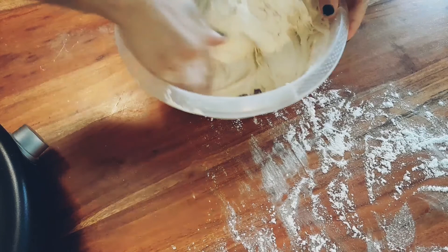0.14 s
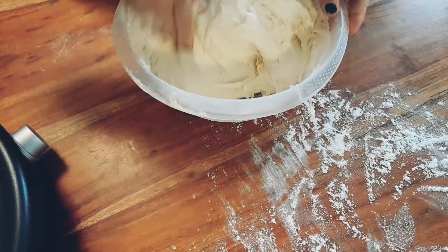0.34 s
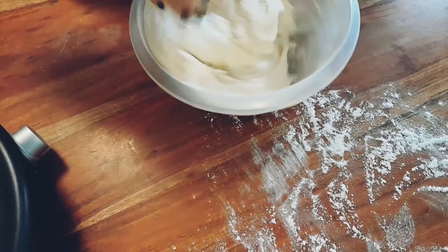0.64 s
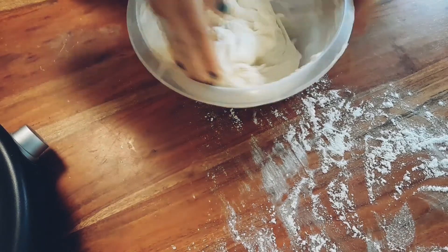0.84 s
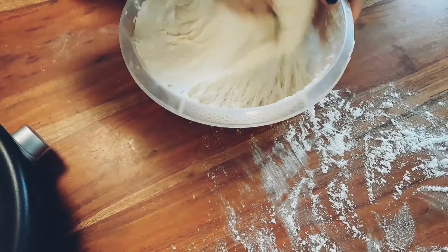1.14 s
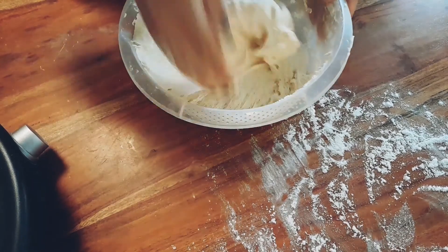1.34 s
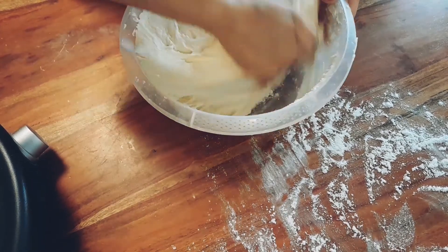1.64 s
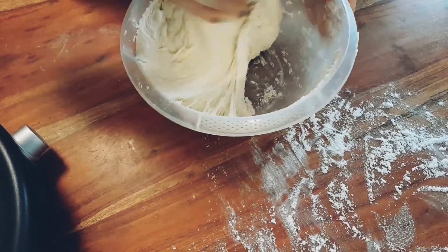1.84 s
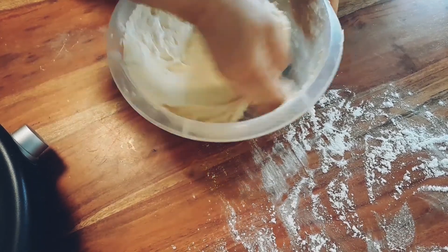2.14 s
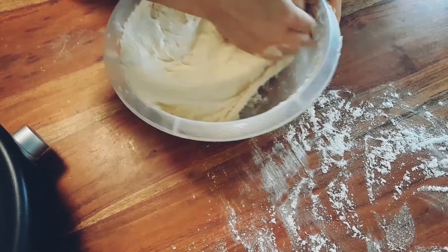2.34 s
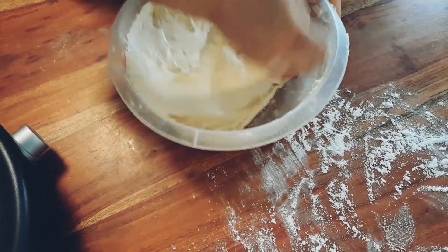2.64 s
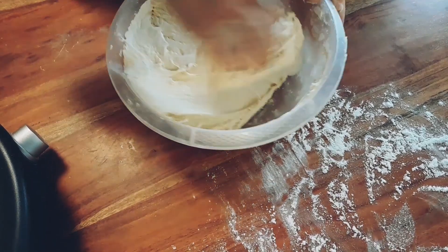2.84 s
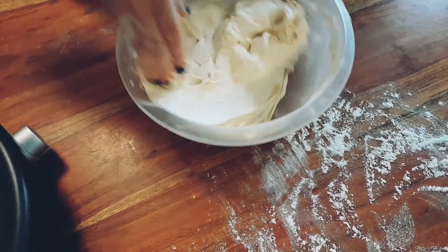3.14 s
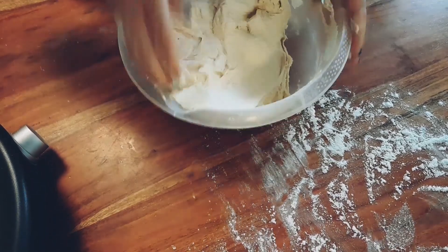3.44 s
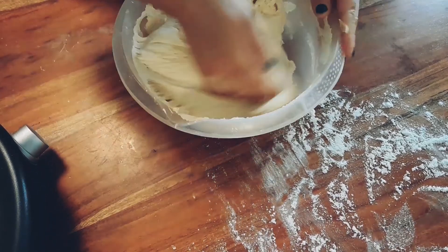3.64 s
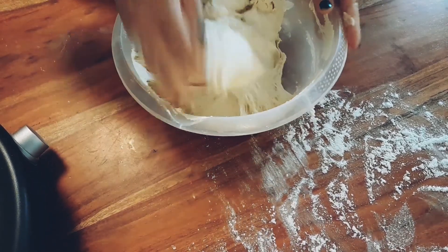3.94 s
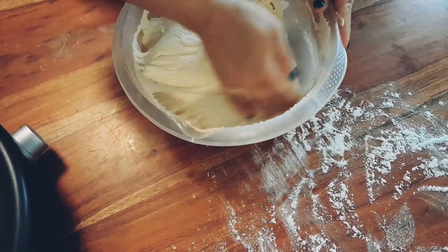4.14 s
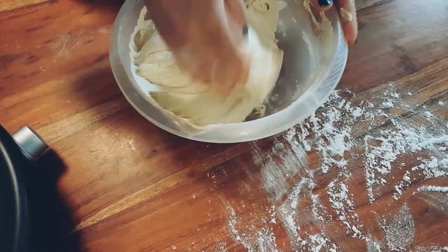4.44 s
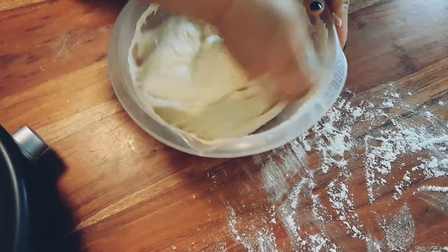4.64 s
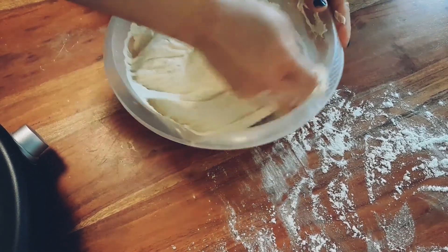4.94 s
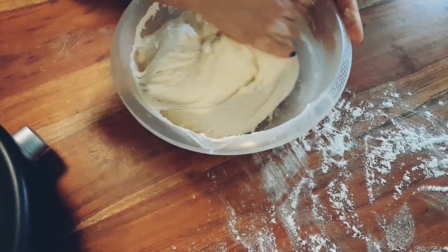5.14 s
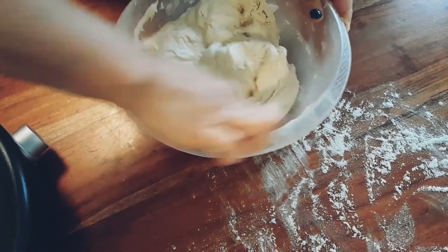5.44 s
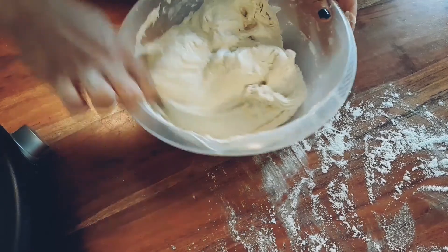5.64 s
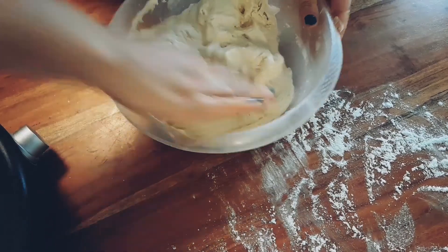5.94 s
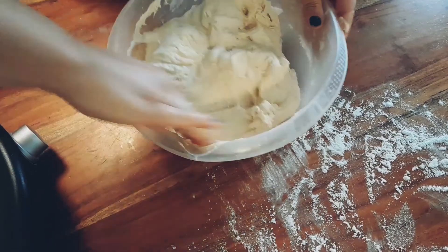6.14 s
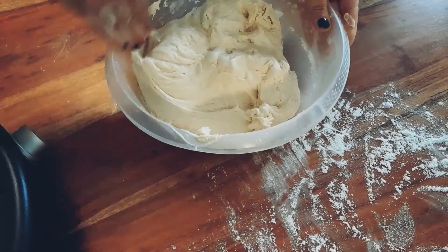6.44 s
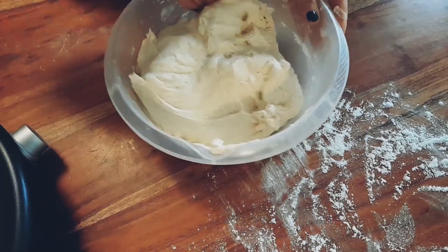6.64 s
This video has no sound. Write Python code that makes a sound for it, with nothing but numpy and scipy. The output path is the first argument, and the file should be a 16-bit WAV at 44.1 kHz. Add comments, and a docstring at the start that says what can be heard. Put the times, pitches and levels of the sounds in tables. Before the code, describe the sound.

Hands knead soft, sticky dough in a plastic bowl, with wet squelches, fine peeling crackles, popping air pockets and dull table thumps in a small kitchen.

```python
"""On a wooden table in a small, hard kitchen, a hand kneads soft, sticky dough in a plastic bowl.
Pushes excite damped modes of the table and a dull noise thud in the dough; air pockets burst as
a crack, a puff and a brief cavity ring. Peeling dough crackles as random impulses, with wet bubbles
squelching below. Near the end skin rubs over the bowl's rim as filtered stick-slip noise.
One wall echo, diffuse reverberation and faint room tone surround them."""
import sys
import numpy as np
from scipy import signal
from scipy.fft import rfft, irfft, next_fast_len
from scipy.io import wavfile
from scipy.ndimage import map_coordinates

SR = 44100
rng = np.random.default_rng(int(sys.argv[2]) if len(sys.argv) > 2 else 0)


def to_wav(sig):
    """Store sig (one row per channel, or 1-D mono) as 16-bit WAV at the path in sys.argv[1].

    Samples outside -1..1 are clipped; the rate is SR.
    """
    pcm = np.clip(np.atleast_2d(sig), -1, 1) * 32767
    pcm = np.round(pcm).astype(np.int16)
    wavfile.write(sys.argv[1], SR, pcm.T)  # frames by channels


N = 299174

# Strokes of the hand through the dough:
# (time of the height [s], swell [s], ebb [s], relative crackle level [dB], squelch relative to crackle [dB])
STROKES = [(0.047, 0.035, .08, -60.5, 4), (0.11, 0.031, 0.16, -53, 0.5), (0.655, 0.11, 0.059, -53, 9.5),
           (0.709, 0.3, 0.14, -46.5, -8), (0.902, 0.04, 0.14, -47, -1), (1.12, 0.43, 0.086, -58.5, 2.5),
           (1.243, .039, 0.078, -64, 4), (1.429, 0.018, 0.17, -60.5, -3), (1.509, 0.081, .13, -57.5, 4.5),
           (1.63, 0.068, 0.24, -60, 0.5), (1.83, 0.16, 0.035, -63, 9), (1.978, 0.13, 0.25, -61, 6),
           (2.115, 0.027, 0.14, -58, 9), (2.243, 0.1, 0.061, -52.5, 5), (2.377, 0.089, 0.032, -52.5, 5),
           (2.645, .13, 0.18, -59.5, 3.5), (2.795, 0.044, 0.062, -65, 9.5), (2.945, 0.12, 0.22, -57, 5),
           (3.216, 0.23, 0.18, -48, -3), (3.472, 0.01, 0.19, -52, 0), (3.563, 0.052, 0.03, -53.5, 5),
           (3.793, 0.035, 0.14, -63, 13.5), (4.118, 0.13, 0.058, -55.5, 1), (4.249, 0.047, 0.096, -63, 3),
           (4.41, 0.19, 0.13, -74, 1.5), (4.617, 0.12, 0.13, -52.5, -4), (4.835, 0.07, .065, -57, 3),
           (4.932, 0.037, 0.21, -59.5, 3), (5.05, 0.076, 0.038, -46.5, -7),
           (5.11, 0.035, 0.022, -47.5, 1.5), (5.225, 0.078, 0.061, -58.5, -3), (5.489, 0.12, .16, -57, 8),
           (5.703, 0.12, 0.14, -61.5, 4), (6.06, 0.21, 0.071, -58, -4), (6.145, 0.22, 0.16, -58.5, 2),
           (6.42, 0.19, 0.072, -65, 2), (6.515, 0.052, 0.038, -50.5, -9), (6.6, 0.078, .16, -56.5, 0.5),
           (6.765, 0.032, 0.017, -59, -3)]
# Pushes on the bowl, relative levels:
# (time [s], low table sway [dB], higher table boom [dB], dough squash [dB], rise [s])
PUSHES = [(0.0, -42, -35, -41, 0.0014), (0.063, -40, -66, -49, 0.024), (0.123, -44.5, -46.5, -39.5, 0.01),
          (0.618, -40, -26, -37, 0.013), (0.643, -44, -21, -23, 0.0047), (0.69, -34, -30, -30.5, .0051),
          (0.888, -48, -32.5, -30.5, 0.012), (0.923, -36, -30.5, -26.5, .0025),
          (1.225, -45.5, -48, -50, 0.017), (1.427, -41.5, -46.5, -50, 0.038),
          (2.101, -60, -58, -39, 0.0065), (2.536, -48, -57, -47, 0.022), (2.86, -54, -52.5, -49, 0.0087),
          (3.15, -58, -68, -54, .005), (3.47, -67, -44, -46, 0.0056), (3.512, -48, -46, -57, .0054),
          (3.866, -47, -47.5, -47.5, 0.027), (4.011, -41, -50, -50, 0.014), (4.09, -51, -53.5, -56, 0.015),
          (4.581, -49.5, -55.5, -49.5, 0.094), (4.814, -46, -33, -44, 0.018),
          (4.835, -31, -38.5, -40.5, 0.013), (4.908, -41, -32.5, -31, 0.0033),
          (4.985, -40, -36, -36.5, 0.026), (5.039, -32, -32, -30, 0.00094), (5.44, -56, -58, -41, 0.0036),
          (5.466, -44.5, -40.5, -36.5, 0.0041), (5.536, -36, -37.5, -36.5, 0.0096),
          (6.012, -35.5, -48.5, -47, .044), (6.073, -46, -49, -48.5, 0.045)]
# Bursting air pockets:
# (time [s], relative level [dB], pitch [Hz], relative wet crack level [dB], left minus right [dB])
POPS = [(0.037, -34, 2300, -21, 0.5), (0.105, -43, 670, -1, 3), (0.648, -27.5, 770, -5, 5),
        (0.804, -27, 830, 6.5, -1), (1.202, -35.5, 1280, -12, -1), (1.301, -46, 1550, -10, 5),
        (1.821, -41, 930, -10, 5), (2.104, -35.5, 583, 10.5, 4.5), (2.352, -24, 1166, -12.5, 3.5),
        (2.537, -42, 1010, 10, 2), (2.989, -39, 1930, -14, 4), (3.152, -36, 840, -16, 5),
        (3.281, -41.5, 430, -2, -7), (3.783, -14.5, 1013, -28, 0.5), (3.992, -37.5, 720, -22, 1),
        (4.911, -35, 1430, -3, -5), (5.001, -16, 6530, 3.5, 5.5), (5.0033, -13.5, 5320, -9.5, -15),
        (5.396, -32, 1570, 1, 3), (5.4384, -25.5, 1010, -10.5, 6.5), (6.024, -30, 1810, -5, 3.5),
        (6.239, -32.5, 1000, -15, -5), (6.347, -33, 1620, 2.5, 0)]
# Modes of the table, from sway up to boom: (frequency [Hz], relative level [dB], t60 [s])
TABLE_MODES = [(63.3, 1, 0.35), (88.6, -11.5, 0.4), (98, -22, 0.47), (132.6, -0.5, 0.31),
               (223.7, -22, 0.24)]
# Resonances of the plastic shell: (frequency [Hz], width [Hz], gain [dB])
BOWL_MODES = [(231.9, 4.9, 5), (330.6, 37, 0.5), (428.8, 6.8, 7), (518, 10, -3), (617, 30, 2),
              (978, 24, -1)]
# Colour of the dough's thud: (frequency [Hz], relative level [dB])
SQUASH_COLOUR = [(25, -45), (55, -16), (110, -12), (170, -2.5), (230, 1.5), (320, -5.5), (600, -16.5),
                 (1500, -28), (4000, -36.5)]
# Colour of a tearing skin: (frequency [Hz], relative level [dB])
SNAP_COLOUR = [(300, -3.5), (700, -6.5), (1300, -1), (2100, -5.5), (2900, 1.5), (3700, -4), (5200, -1),
               (7400, 3), (9800, -12), (13000, -6), (16000, -19)]
# Colour of the snapping threads: (frequency [Hz], relative level [dB])
CRACKLE_COLOUR = [(300, -24), (1200, -7), (2200, 0.5), (3000, -1.5), (3700, -1.5), (5000, -2), (6200, -2.5),
                  (7600, 1), (9800, -9), (13000, -5), (16000, -12.5)]
# Colour of the wet cavities: (frequency [Hz], relative level [dB])
SQUELCH_COLOUR = [(60, 3.5), (170, 4), (300, -9.5), (420, -2.5), (680, -4.5), (1050, 5), (1600, 5.5),
                  (2400, 5.5), (4000, -1.5), (9000, -16)]
# Colour of skin on the rim: (frequency [Hz], relative level [dB])
RIM_COLOUR = [(150, -29), (300, -19), (420, -8.5), (650, -7.5), (820, -12), (1030, 3), (1300, -13.5),
              (1700, -20), (2600, -14.5), (3800, -30.5), (8000, -37.5)]
# Colour of the room tone: (frequency [Hz], relative level [dB])
TONE_COLOUR = [(20, -3), (60, -3), (130, 8), (220, -12), (420, 0), (800, -27), (2000, -14), (5000, -28),
               (7500, -13.5), (16000, -22)]
# Reverberation time of the kitchen: (frequency [Hz], t60 [s])
KITCHEN_T60 = [(150, 0.4), (600, 0.38), (1500, 0.26), (5000, 0.29), (15000, 0.27)]
# How unlike the reverberation is at the two ports: (frequency [Hz], share [0-1])
DIFFUSENESS = [(150, 0.52), (300, 0.31), (700, 0.95), (2000, 0.84)]
# Difference in colour of the two ports: (frequency [Hz], left minus right [dB])
PORT_BALANCE = [(100, 2.5), (270, 4), (600, 4), (2000, 8), (3300, 5.5), (5000, -1), (8000, 4.5),
                (14000, 6.5)]

TOP_HZ = 15950  # band limit of the ports
EDGE_DB, SWELL_SHAPE, EBB_SHAPE = 18, 1.51, 1.35  # fall over one swell or ebb time; 1 = pointed, 2 = rounded
RUB_S, RUB_SWELL_S, RUB_EBB_S, RUB_DB = 6.306, 0.081, 0.068, -41.5  # the hand passing over the rim
SQUASH_T60_S = 0.12  # the dough's own thud dies quickly
RING_T60_S = 0.0072  # ring of a cavity at 1 kHz; it halves for every two octaves up
PUFF_DB, PUFF_FALL_DB = 7.5, 2  # puff over the ring at 1 kHz; fall per octave, as small pockets hold less air
HALVES = np.array([[0.5], [-0.5]])  # shares a left-right difference between the ports


def amp(db):
    """Logarithmic level: decibels become an amplitude ratio."""
    return 10 ** (np.asarray(db) / 20)


def unit(x):
    """Effective value: x is scaled to rms 1."""
    return x / np.sqrt(np.mean(x ** 2) + 1e-20)


def along(points, hz):
    """Logarithmic interpolation: (frequency, value) points are read on a log frequency axis."""
    f, v = np.transpose(points)
    return np.interp(np.log(hz + 1), np.log(f + 1), v)


def wobble(rate):
    """Random modulation: a smooth curve through random knots, rate of them a second."""
    knots = rng.standard_normal(int(N * rate / SR) + 4)
    return map_coordinates(knots, [np.arange(N) * rate / SR])


def filtered(x, response):
    """Linear filtering: the spectrum of x is multiplied by a response of frequency."""
    n = x.shape[-1]
    m = next_fast_len(n + 8192)
    return irfft(rfft(x, m) * response(np.fft.rfftfreq(m, 1 / SR)), m)[..., :n]


def coloured(x, spectrum):
    """Spectral shaping: x passes a curve of gains in decibels and leaves at rms 1."""
    return unit(filtered(x, lambda hz: amp(along(spectrum, hz))))


def add(track, s, sound):
    """Superposition: a sound is mixed into the track at time s."""
    part = track[..., max(round(s * SR), 0):][..., :sound.shape[-1]]
    part += sound[..., :part.shape[-1]]


def sparks(rate, spread_db):
    """Shot noise: random impulses of either sign and unequal size, at rms 1."""
    chance = rng.random(N)
    size = np.clip(rng.standard_normal(N), -2.5, 2.5)
    sign = rng.choice([-1, 1], N)
    return unit((chance < rate / SR) * amp(spread_db * size) * sign)


def room_tone():
    """Stationary noise: a part shared by both ports and a part independent at each."""
    shared = rng.standard_normal(N)
    separate = 0.9 * rng.standard_normal((2, N))
    return amp(-69.5) * coloured(shared + separate, TONE_COLOUR)


def bowl(x):
    """Shell resonance: damped second-order modes of the plastic add to the sound that drives them."""
    def response(f):
        modes = [amp(db) * 1j * f * w / (c * c - f * f + 1j * f * w) for c, w, db in BOWL_MODES]
        return 1 + sum(modes)
    return filtered(x, response)


def pushes():
    """Impact excitation: each push squashes the dough with a dull thud and sets table modes ringing."""
    wood, dough, t = np.zeros(N), np.zeros(N), np.arange(SR // 2) / SR
    for s, sway_db, boom_db, squash_db, rise in PUSHES:
        onset = np.sin(np.pi / 2 * np.minimum(t / rise, 1))
        after = np.maximum(t - rise, 0)
        thud = coloured(rng.standard_normal(len(t)), SQUASH_COLOUR)
        add(dough, s, onset * amp(squash_db - 9.5 - 60 * after / SQUASH_T60_S) * thud)
        for k, (hz, db, t60) in enumerate(TABLE_MODES):
            # each mode's blow lies between the push's sway and boom levels, by frequency
            blow_db = np.interp(hz, [65, 130], [sway_db, boom_db])
            decay = amp(blow_db + db - 60 * after / t60)
            add(wood, s, (-1) ** k * onset * decay * np.sin(2 * np.pi * hz * t))
    return amp(-0.5) * wood + bowl(dough)


def pops():
    """Cavity resonance: a pocket's skin cracks, air puffs out, and the cavity rings for a few cycles."""
    cavities, cracks, t = np.zeros((2, N)), np.zeros((2, N)), np.arange(SR // 16) / SR
    for s, db, hz, crack_db, left_db in POPS:
        ports = amp(db + left_db * HALVES)
        u = 2 * np.pi * hz * t  # phase [rad]
        octaves = np.log2(hz / 1000)
        ring = np.sin(u) * amp(-60 * t * 2 ** (octaves / 2) / RING_T60_S)
        swing = u * (1 - u / 2) * np.exp(-u)  # air moves once out and back
        puff = amp(PUFF_DB - PUFF_FALL_DB * octaves) * swing
        # a small cavity radiates little bass, and its soft walls blunt the attack
        band = [0.39 * hz, min(2.5 * hz, SR / 4.5)]
        reach = signal.butter(2, band, "bandpass", fs=SR, output="sos")
        add(cavities, s, ports * signal.sosfilt(reach, ring + puff))
        shreds = amp(-8.5 - 60 * t / 0.016) * rng.standard_normal(len(t))  # t60 16 ms
        add(cracks, s, ports * amp(crack_db + 6) * ((t == 0) + shreds))
    return cavities + filtered(cracks, lambda hz: amp(along(SNAP_COLOUR, hz)))


def stroke(height_s, swell_s, ebb_s):
    """Amplitude envelope: the gain of one hand movement swells to its height and ebbs."""
    t = np.arange(N) / SR - height_s
    swell = (np.maximum(-t, 0) / swell_s) ** SWELL_SHAPE
    ebb = (np.maximum(t, 0) / ebb_s) ** EBB_SHAPE
    return amp(-EDGE_DB * (swell + ebb).clip(0, 10))


def bubbles(rate, centre_hz, cycles, spread_db, count=4000):
    """Bubble resonance: tiny cavities open at random, each a short ring that rises in pitch."""
    t, track = np.arange(SR // 50) / SR, np.zeros(N + SR)
    when, chance = rng.random((count, 2)).T
    pitch, size = np.clip(rng.standard_normal((count, 2)), -2, 2).T[:, :, None]
    turns = centre_hz * np.exp(0.6 * pitch) * t
    rising = np.sin(2 * np.pi * turns * (1 + 6 * t))
    rings = amp(spread_db * size) * rising * np.exp(-turns / cycles)
    rings *= (chance < rate * N / SR / count)[:, None]  # thins the candidates to the rate
    place = (when * N).astype(int)[:, None] + np.arange(len(t))
    return unit(np.bincount(place.ravel(), rings.ravel(), len(track))[:N])


def smear():
    """Adhesive rupture: sticky threads snap as dough peels from skin and bowl; wet cavities squelch below."""
    peel, squelch = np.zeros(N), np.zeros(N)  # powers: overlapping strokes add
    for s, swell_s, ebb_s, db, squelch_db in STROKES:
        power = (amp(db) * stroke(s, swell_s, ebb_s)) ** 2
        peel += power
        squelch += power * amp(squelch_db) ** 2
    fine, coarse = sparks(rate=3500, spread_db=2.0), sparks(rate=130, spread_db=-2)
    threads = coloured(fine + amp(-12) * coarse, CRACKLE_COLOUR)
    wet = bubbles(rate=500, centre_hz=900, cycles=2, spread_db=3.5)
    wet = wet + amp(3) * sparks(rate=2000, spread_db=3)
    cavities = unit(bowl(coloured(wet, SQUELCH_COLOUR)))
    crackle = amp(0.5 + 2.65 * wobble(70)) * np.sqrt(peel) * threads  # threads let go in clumps
    return crackle + amp(-4.0 + 2.7 * wobble(35)) * np.sqrt(squelch) * cavities


def rub():
    """Stick-slip friction: skin slips in random jerks on the plastic rim, strongest near 1 kHz."""
    slips = sparks(rate=670, spread_db=5.5) + amp(-2.5) * rng.standard_normal(N)
    return amp(RUB_DB) * stroke(RUB_S, RUB_SWELL_S, RUB_EBB_S) * coloured(slips, RIM_COLOUR)


def direct(x, lead=0.0002015, wall_delay=0.00759, wall_db=-10):
    """Path difference: sound reaches the left port first; a close wall adds one midrange echo [s, s, dB]."""
    def response(hz):
        midrange = hz / (hz + 300) / (1 + (hz / 1500) ** 2)
        echo = 1 + amp(wall_db) * midrange * np.exp(-2j * np.pi * hz * wall_delay)
        return echo * np.exp(2j * np.pi * hz * lead * HALVES)
    return filtered(x, response)


def tail():
    """Diffuse reverberation: decaying noise, partly alike at both ports in the bass, less so above."""
    hz, t, z = signal.stft(rng.standard_normal((2, SR // 3)), SR, nperseg=256)
    turn = np.pi / 4 * np.clip(along(DIFFUSENESS, hz), 0, 1)[:, None]
    decay = amp(-60 * t / along(KITCHEN_T60, hz)[:, None])
    z = z * decay * [np.cos(turn), np.sin(turn)]
    mid, side = signal.istft(z, SR, nperseg=256)[1]
    build_up = 1 - np.exp(-(np.arange(len(mid)) / SR / 0.0014) ** 2)  # over about 1.4 ms
    pair = np.array([mid + side, mid - side]) * build_up
    return pair / np.linalg.norm(pair[0])


def kitchen(x, size=2048):
    """Block convolution: each short block meets a freshly drawn random tail, so reverberation stays diffuse."""
    out, padded = np.zeros((2, N + SR)), np.pad(x, (0, size))
    for start in range(0, N, size):
        answer = signal.fftconvolve(padded[None, start:start + size], tail(), axes=1)
        out[:, start:start + answer.shape[1]] += answer
    return out[:, :N]


def scene():
    """Superposition: direct sound of dough, bowl and table, its reverberation, and room tone."""
    tone, thumps, popping = room_tone(), pushes(), pops()
    sticky = smear() + rub()
    spreading = amp(3.0) * sticky + amp(-1) * popping.mean(axis=0) + amp(-9.5) * thumps
    room = kitchen(filtered(spreading, lambda hz: 1 / (1 + (hz / 17000) ** 2)))  # walls absorb the top treble
    return direct(sticky + popping + thumps) + room + tone


def record(dry, low_cut_hz=42):
    """Band limitation: two ports of unlike colour pass neither deep rumble nor the top treble."""
    ports = filtered(dry, lambda hz: amp(HALVES * along(PORT_BALANCE, hz)))
    rumble_cut = signal.butter(2, low_cut_hz, "highpass", fs=SR, output="sos")
    ports = signal.sosfilt(rumble_cut, ports)
    return filtered(ports, lambda hz: hz < TOP_HZ)


dry = scene()
out = record(dry)
to_wav(out)
```